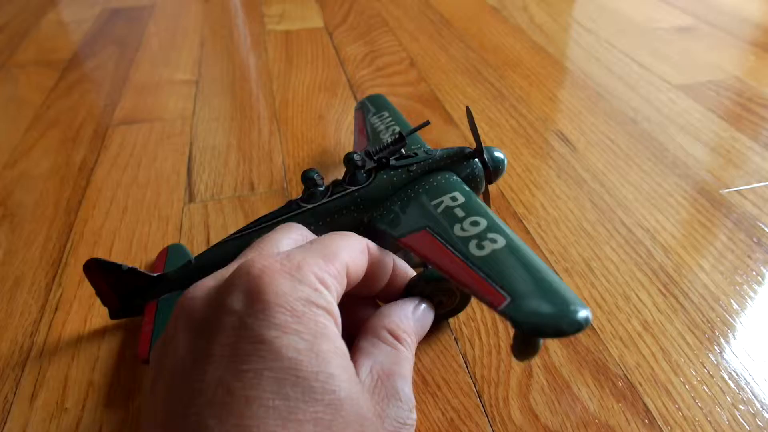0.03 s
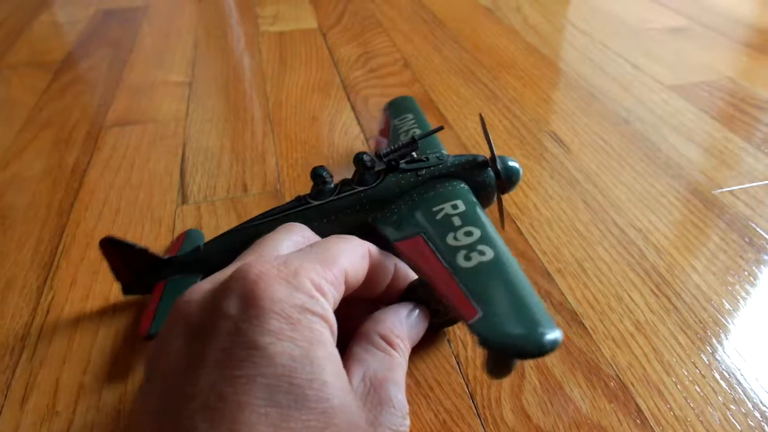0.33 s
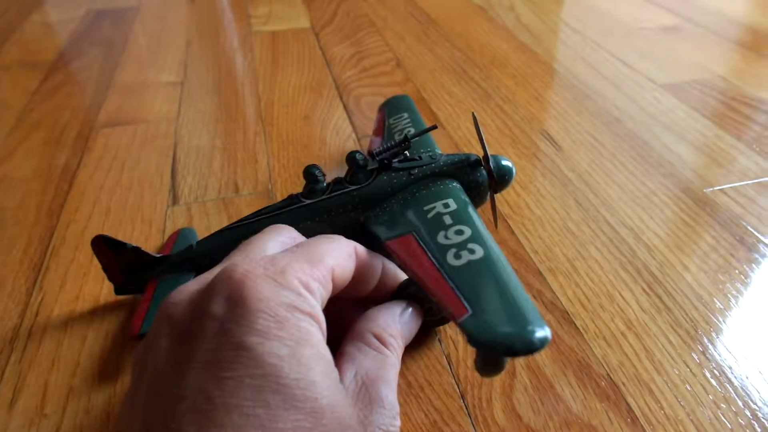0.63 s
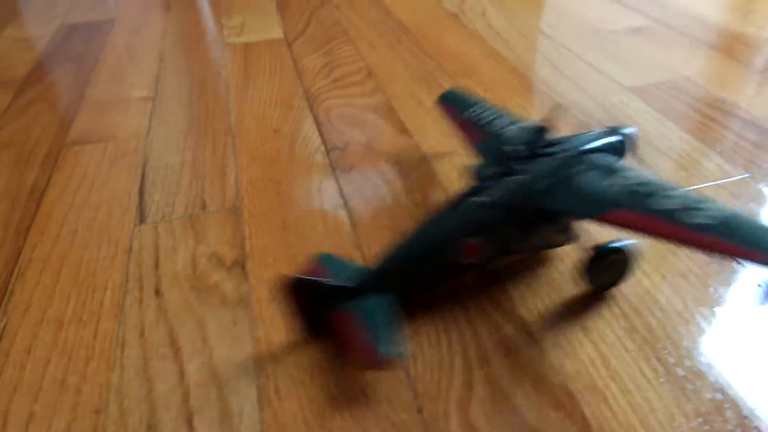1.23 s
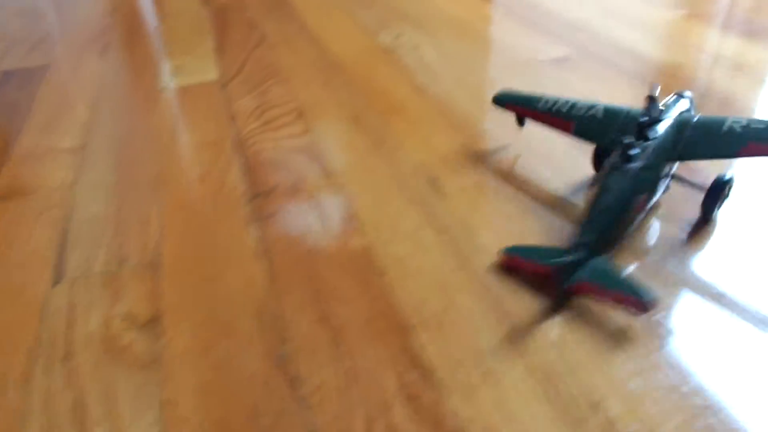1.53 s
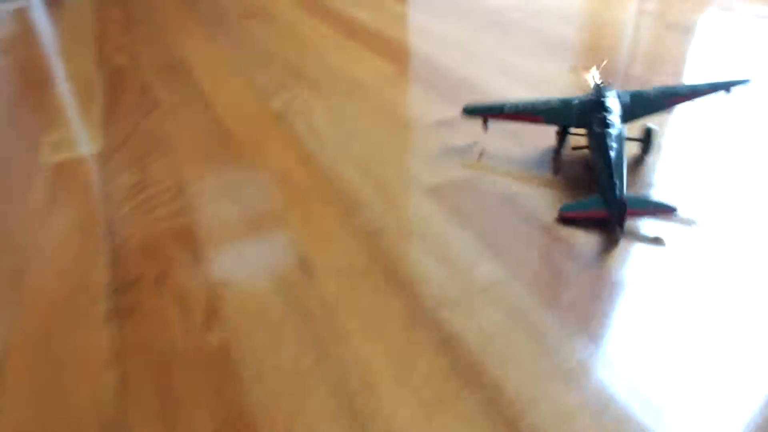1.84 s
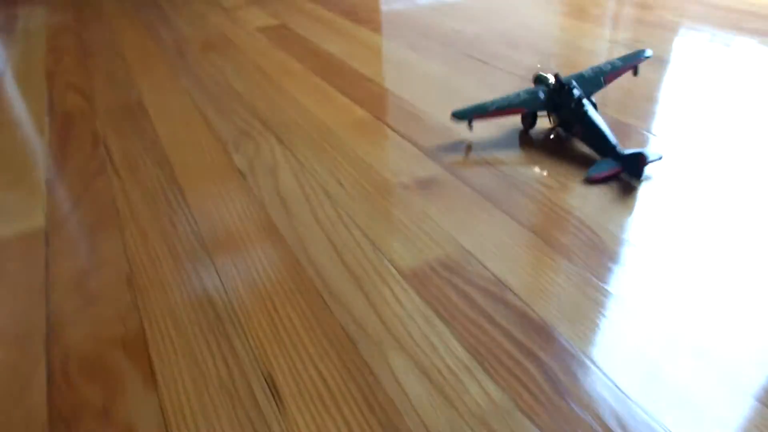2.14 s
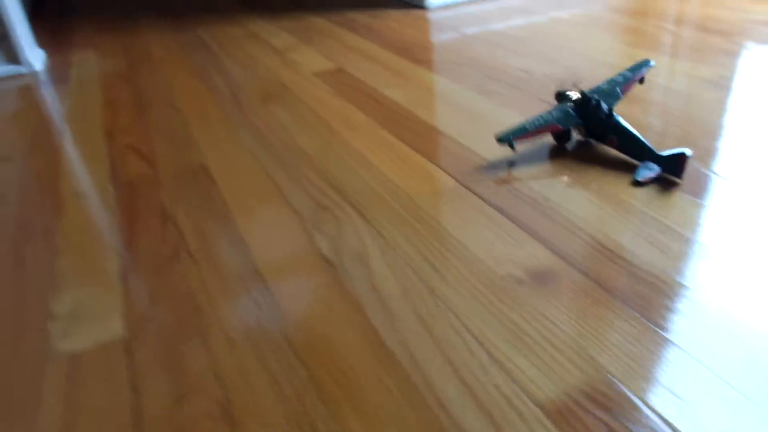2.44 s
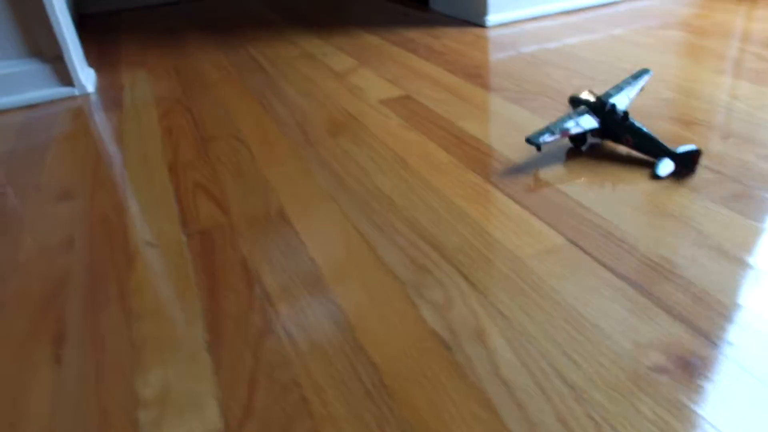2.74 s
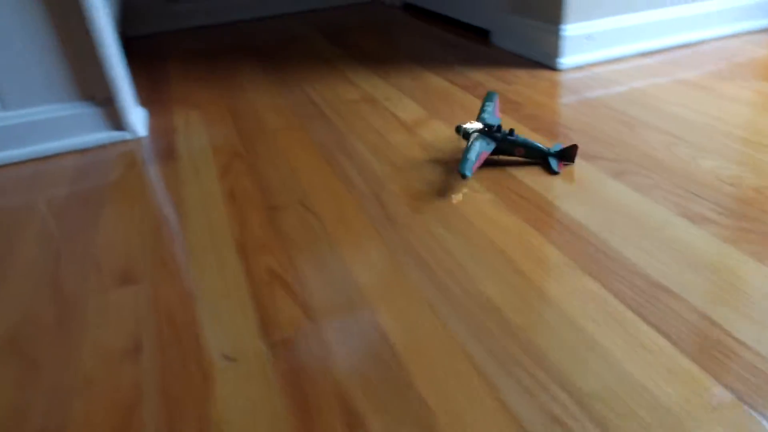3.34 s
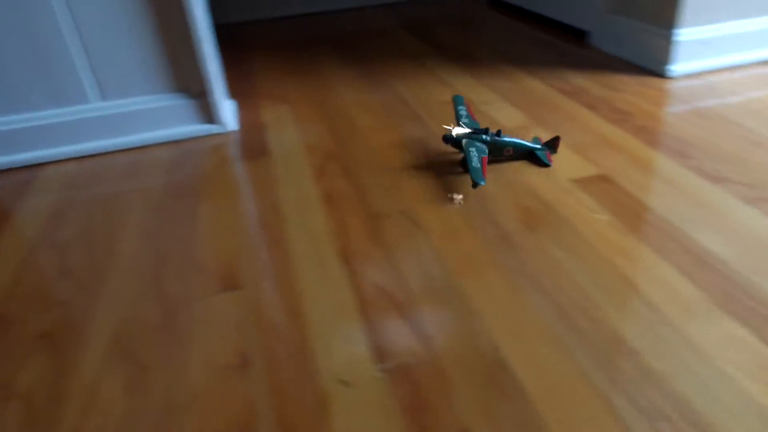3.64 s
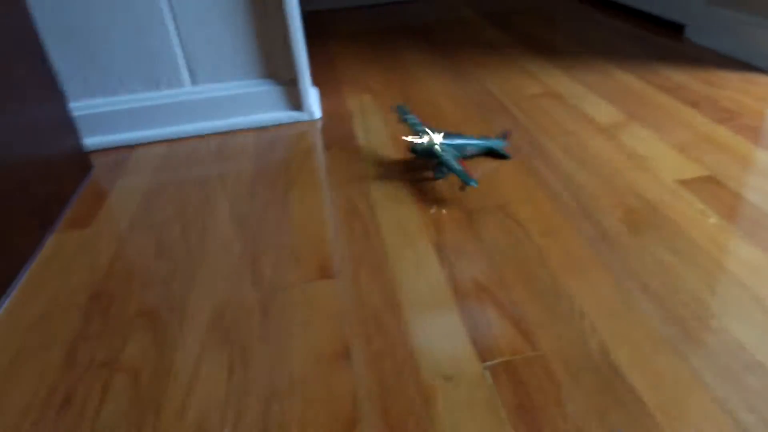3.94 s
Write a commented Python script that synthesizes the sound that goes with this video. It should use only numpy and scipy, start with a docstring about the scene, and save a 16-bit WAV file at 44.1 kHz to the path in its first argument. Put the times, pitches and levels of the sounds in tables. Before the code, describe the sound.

Clockwork whirring from a metal toy plane starts with a sharp snap after a few faint ticks. Its gears grind with a high, scratchy rasp while the wheels knock softly on floorboards, growing slightly more echoing indoors.

```python
"""Clockwork tin plane

A wound toy is held on a wooden floor, clicks a few times in the hand, then is let go and rolls away.
Gear teeth excite the modes of its tin shell, a flint rasps by friction on the spark wheel, and the
wheels rumble and knock softly on the boards. A small live room with a faint low hum surrounds it."""
import sys
import numpy as np
from scipy import signal
from scipy.fft import rfft, irfft, next_fast_len
from scipy.io import wavfile
from scipy.ndimage import map_coordinates

SR = 44100
rng = np.random.default_rng(int(sys.argv[2]) if len(sys.argv) > 2 else 0)


def master(y):
    """Save y as 16-bit WAV."""
    cut = np.clip(np.atleast_2d(y).T, -1, 1)
    pcm = np.round(cut * 32767)  # scale
    wavfile.write(sys.argv[1], SR, pcm.astype(np.int16))


N = 176400
T = np.arange(N) / SR

# modes of the tin shell: f/Hz, relative level/dB, t60/s
SHELL_MODES = [(957,-2,0.037),(1087,0.5,.03),(1256,0.5,0.013),(1495,-1.5,0.023),(1647,1,0.012),(1756,-3.5,0.018),(1880,0.5,0.022),(1975,0.5,0.019),(2204,-2.5,0.0087),(3450,-4.5,0.016),(4120,1.5,0.0083),(4600,-4,0.0084),(4850,2,0.0098),(5420,-3.5,0.0077)]


def from_db(db):
    """Amplitude ratio: a factor of ten for every 20 dB."""
    return 10 ** (np.asarray(db) / 20)


def unit_rms(x):
    """Normalisation to unit mean power."""
    return x / np.sqrt(np.mean(x ** 2) + 1e-20)


def in_time(curve):
    """Linear interpolation of (t/s, value) points at every sample."""
    return np.interp(T, *np.transpose(curve))


def colour(x, points, share=1):
    """Minimum-phase filter through (f/Hz, level/dB) points; folding the cepstrum makes it causal."""
    size = next_fast_len(N + SR // 2, True)
    hz, db = np.transpose(points)
    f = np.maximum(np.fft.rfftfreq(size, 1 / SR), 1)
    gain = from_db(share * np.interp(np.log(f), np.log(hz), db))
    cepstrum = irfft(np.log(gain), size)
    cepstrum[1:size // 2] *= 2
    cepstrum[size // 2 + 1:] = 0
    return irfft(rfft(x, size) * np.exp(rfft(cepstrum)), size)[..., :N]


def drift(corner_hz):
    """Slow random fluctuation: low-passed noise of unit rms."""
    hop, settle = 40, 2000
    r = np.exp(-2 * np.pi * corner_hz * hop / SR)
    noise = rng.standard_normal(N // hop + settle + 2)
    slow = signal.lfilter([1], [1, -2 * r, r * r], noise)[settle:]
    return np.interp(np.arange(N) / hop, np.arange(len(slow)), unit_rms(slow))


def ring(x, hz, t60):
    """Damped resonator, scaled to pass the same white-noise power whatever its decay."""
    r, w = from_db(-60 / (t60 * SR)), 2 * np.pi * hz / SR
    numerator = np.sqrt((1 - r * r) / 2) * np.array([1, 0, -1])
    return signal.lfilter(numerator, [1, -2 * r * np.cos(w), r * r], x + 1e-18)


def modes(x, table):
    """Modal superposition: a struck body responds as the sum of its resonances."""
    return sum(from_db(db) * ring(x, hz, t60) for hz, db, t60 in table)


def grains(per_s, spread_db):
    """Shot noise: independent tiny impacts, a few of them larger."""
    sizes = from_db(spread_db * np.minimum(rng.exponential(1, N), 4)) * rng.choice([-1, 1], N)
    return sizes * (rng.random(N) < per_s / SR)


def burst(onset_s, db, decay_s):
    """A brief rough contact: noise under an exponential decay."""
    envelope = (T >= onset_s) * np.exp(-np.minimum(abs(T - onset_s) / decay_s, 20))
    return from_db(db) * envelope * rng.standard_normal(N)


def room_tone():
    """Background noise: broadband air, with narrow noise bands heard as a low hum and a faint whine."""
    # spectrum of the air noise: f/Hz, relative density level/dB
    air_spectrum = [(15,-31),(25,-11),(53,-14),(80,-4.5),(180,-3),(570,-7.5),(800,-10),(1600,-12.5),(4000,-20),(8000,-29.5),(12500,-35),(15500,-42)]
    mid, side = rng.standard_normal((2, N))
    air = unit_rms(colour(mid + 0.62 * side * [[1], [-1]], air_spectrum))
    hum_hz = 82.9
    hum = unit_rms(ring(ring(rng.standard_normal(N), hum_hz, t60=.2), hum_hz, t60=.2))
    whine = unit_rms(ring(rng.standard_normal((2, N)), hz=11060, t60=0.016))
    return from_db(-55) * air + from_db(-68) * hum + from_db(-78.5) * whine


def reverberation(x, t60=0.47, step_s=.06):
    """Diffuse field: dense decaying reflections, different in each channel, renewed as the toy travels."""
    # colour of the reflections: f/Hz, gain/dB
    room_colour = [(100,-9),(700,-5),(1500,-1.5),(3500,0.5),(8000,1.5),(15000,4.5)]
    t, step = T[:SR // 2], int(step_s * SR)
    decay = from_db(-60 * t / t60) * (t > .001)
    decay /= np.sqrt(np.sum(decay ** 2))
    crossfade = np.sqrt(np.hanning(2 * step))
    out = np.zeros((2, N + SR))
    for start in range(0, N, step):
        piece = x[start:start + 2 * step]
        response = decay * rng.standard_normal((2, len(t)))
        echo = signal.fftconvolve([piece * crossfade[:len(piece)]], response, axes=1)
        out[:, start:start + echo.shape[1]] += echo
    return colour(out[:, :N], room_colour)


def wheels(start_s=1.12, rise_s=0.76):
    """Rolling noise: a rumble grows as the toy gathers speed, with dull impacts on the boards."""
    # spectrum of the rumble: f/Hz, relative density level/dB
    roll_spectrum = [(25,-12),(55,-5),(82,8),(120,-9),(190,-14.5),(270,6),(370,-8),(500,-7.5),(900,-14),(3000,-49)]
    # knocks on the boards: t/s, relative level/dB
    bumps = [(1.439,-39.5),(1.60,-44),(1.704,-41.5),(1.83,-48),(2.102,-48),(2.76,-49),(2.914,-47.5),(3.058,-43),(3.34,-50)]
    # colour of a knock: f/Hz, relative level/dB
    thud_colour = [(80,-33),(280,-7),(480,-3),(680,-5.5),(1200,-8),(4000,-40)]
    rise = np.clip((T - start_s) / rise_s, 0, 1)
    rumble = from_db(-61) * rise * unit_rms(colour(rng.standard_normal(N), roll_spectrum))
    knocks = sum(burst(s, db, decay_s=0.031) for s, db in bumps)
    return rumble + 10 * colour(knocks, thud_colour)


def catch_clicks():
    """Impact excitation: catch and gears slip and ring the shell; the wound spring pings as it settles."""
    # slips: t/s, relative level/dB, decay/s, low-pass f/Hz, shell drive/dB, catch drive/dB
    clicks = [(.208,-49,0.048,5000,-5,-10),(0.25,-41,.004,7000,-8,-2.5),(0.275,-34.5,0.0023,2500,-2,-18),(.282,-41,0.0034,4000,-6,-17),(0.299,-33.5,0.0058,6960,-2,-18),(0.326,-30.5,0.0063,2800,-5,-16),(.439,-38,0.0042,1900,-3,-21),(.857,-16,0.0022,9000,-9,-28),(.866,-26.5,0.0092,2500,0,-28),(.935,-25,0.0068,4000,-6,-20),(0.977,-31,0.0033,3000,-8,-24),(1.438,-23.5,0.0036,5000,-4,-24)]
    # colour of the contact noise: f/Hz, relative level/dB
    click_colour = [(60,-47),(250,-26),(600,-11.5),(800,-6.5),(1050,6),(1900,0.5),(2600,-2),(3350,0),(4300,-4.5),(5300,-1),(7000,-11),(15000,-6.5)]
    # modes of the catch: f/Hz, relative level/dB, t60/s
    catch_modes = [(3136,4,0.067),(3550,0,0.11),(5300,-11,0.08)]
    # modes of the coiled spring: f/Hz, relative level/dB, t60/s
    spring_modes = [(1946,3,0.062),(1987,5.5,0.13)]
    # pings of the spring: t/s, relative level/dB
    pings = [(0.441,-52),(0.49,-59),(.52,-65)]
    hits = np.array([signal.lfilter(*signal.butter(1, hz, fs=SR), burst(s, db, decay_s))
                     for s, db, decay_s, hz, *_ in clicks])
    *_, shell_db, catch_db = np.transpose(clicks)
    shell = modes(from_db(shell_db) @ hits, SHELL_MODES) / len(SHELL_MODES)
    catch = modes(from_db(catch_db) @ hits, catch_modes)
    spring = modes(sum(burst(s, db, decay_s=0.0051) for s, db in pings), spring_modes)
    return 2 * colour(hits.sum(0), click_colour) + shell + catch + 2 * spring


def flint_squeaks(per_s=22):
    """Stick-slip: the flint catches and rings briefly, each time at its own shrill pitch."""
    out = np.zeros(N + SR)
    for when, pitch, length in rng.random((int(per_s * N / SR), 3)):
        start = int(when * N)
        size = int(SR * 0.0072 * (.5 + 2 * length))
        slip = rng.standard_normal(size) * np.hanning(size)
        out[start:start + size] += ring(slip, hz=7000 + 8500 * pitch, t60=0.0046)
    return unit_rms(out[:N])


def gear_teeth(speed, teeth_per_s=135, jitter_periods=.12, spread_db=2.84):
    """Gear meshing: one impulse per tooth, uneven in time and strength."""
    position = np.cumsum(teeth_per_s * speed) / SR + jitter_periods * drift(60)
    count = np.floor(np.maximum.accumulate(position))
    return np.diff(count, prepend=count[0]) * from_db(spread_db * rng.standard_normal(N))


def grinding(teeth, pressure, spectrum, flicker_db):
    """Friction noise: grit and tooth ticks scale with pressure; bands flicker as the contact shifts."""
    grit = (grains(per_s=9000, spread_db=2) + from_db(9.5) * teeth) * pressure
    edges_hz = np.r_[90, np.linspace(800, 16500, 22)]
    out = 0
    for low, high in zip(edges_hz, edges_hz[1:]):
        band = signal.butter(2, [low, high], "band", fs=SR, output="sos")
        flicker = from_db(flicker_db * drift(14.7))
        out += flicker * signal.sosfilt(band, grit * rng.choice([-1, 1], N) + 1e-18)
    return unit_rms(colour(out, spectrum))


def shell_rattle(teeth, flicker_db=1.5, surge_db=0.94):
    """Forced vibration: teeth and loose parts strike the shell; groups of its modes swell separately."""
    # envelopes of four groups of modes, lowest first: t/s, relative level/dB
    belly_level = [(0.88, -37), (0.91, -48), (0.95, -36), (2.17, -41), (2.36, -34), (2.44, -49),
                   (2.61, -41), (2.7, -55), (2.75, -38.5), (3.24, -47), (3.37, -36), (3.5, -40.5),
                   (3.97, -38.5), (4.0, -31.5)]
    rattle_level = [(.88,-27.5),(.91,-49),(1.0,-36),(1.13,-34),(1.2,-31),(1.27,-28.5),(1.32,-32),(1.45,-30.5),(1.55,-33.5),(1.75,-28.5),(1.82,-34),(1.96,-28),(2.01,-34),(2.06,-30.5),(2.22,-33.5),(2.29,-29.5),(2.47,-38.5),(2.56,-30.5),(2.69,-44),(2.76,-32.5),(2.96,-36),(3.07,-32.5),(3.23,-36),(3.34,-29),(3.43,-35),(4,-32.5)]
    scrape_level = [(.88,-35),(1.3,-46),(1.9,-43.5),(2.6,-49),(3.28,-43),(3.33,-35),(3.8,-37),(4,-43)]
    tinny_level = [(.88,-31),(1.05,-37),(1.2,-32.5),(1.42,-39.5),(2.36,-44),(2.47,-36),(2.62,-45),(2.74,-52),(2.83,-35),(2.95,-48),(3.28,-42),(3.4,-37.5),(3.8,-36.5),(4,-43.5)]
    # lower f/Hz, upper f/Hz, envelope, gain/dB
    groups = [(800, 1400, belly_level, -1), (1400, 2900, rattle_level, -1.63),
              (2900, 4350, scrape_level, 0), (4350, 7000, tinny_level, 0)]
    loose_parts = from_db(-8.5) * grains(per_s=1500, spread_db=1.14)
    knocks = (teeth + loose_parts) * from_db(surge_db * drift(9.6))
    out = 0
    for low, high, level, gain_db in groups:
        rings = sum(from_db(db + flicker_db * drift(4.6)) * ring(knocks * rng.standard_normal(N), hz, t60)
                    for hz, db, t60 in SHELL_MODES if low <= hz < high)
        rings = signal.sosfilt(signal.butter(4, low, "high", fs=SR, output="sos"), rings)
        out += from_db(in_time(level) + gain_db) * unit_rms(rings)
    return out


def clockwork(release_s=.857, run_up_s=0.0026, spark_wheel_hz=36.6):
    """Impact and friction: the released spring drives the gears and the spark wheel at a wandering speed."""
    # spectra of the gear whirr and the flint rasp: f/Hz, relative density level/dB
    whirr_spectrum = [(100,-33),(300,-19),(650,-10.5),(950,-3.5),(1900,3),(2750,-1),(3600,0.5),(5200,-1),(6400,-1),(8000,-21),(15000,-26)]
    rasp_spectrum = [(2500,-22),(5500,-10),(7300,1.5),(8500,-0.5),(9600,0.5),(11200,0),(12700,-2),(14200,-1.5),(15500,0)]
    # their envelopes: t/s, relative level/dB
    whirr_level = [(0.88, -32), (1.07, -33), (1.19, -31.5), (1.51, -32), (1.87, -29.5), (2.43, -32.5),
                   (2.48, -31), (2.69, -32.5), (3.08, -32), (3.3, -32.5), (3.31, -31), (3.74, -32.5),
                   (3.77, -31.5), (4.0, -31.5)]
    rasp_level = [(.88,-30),(.97,-33),(1.04,-30),(1.25,-33),(1.44,-32.5),(1.75,-32.5),(2.2,-34),(2.6,-35),(2.96,-35),(3.25,-33.5),(3.6,-35),(4,-33.5)]
    whirr_db, rasp_db = in_time(whirr_level), in_time(rasp_level)
    speed = 1 + .06 * drift(1.2)
    teeth = gear_teeth(speed)
    wheel_angle = 2 * np.pi * np.cumsum(spark_wheel_hz * speed) / SR
    # the spark wheel runs out of true, and the flint's grip varies
    pressure = from_db(1.1 * np.sin(wheel_angle) + 0.9 * drift(46))
    rattle = shell_rattle(teeth)
    whirr = from_db(whirr_db + 0.3) * grinding(teeth, pressure, whirr_spectrum, flicker_db=1.1)
    rasp = from_db(rasp_db + 0.6) * grinding(teeth, pressure, rasp_spectrum, flicker_db=1.36)
    squeaks = from_db(rasp_db - np.median(rasp_db) - 42.5) * flint_squeaks()
    running = np.clip((T - release_s) / run_up_s, 0, 1)
    return (rattle + whirr + rasp + squeaks) * running


def scene():
    """Direct and reverberant sound: the room's share grows as the toy rolls away."""
    # bearing of the toy: t/s, delay of the left channel/s
    left_lag = [(.9,0.000024),(1.6,0.000053),(2.6,0.000045),(3.1,0.000034),(3.6,0.00003)]
    toy = clockwork() + catch_clicks() + wheels()
    left = map_coordinates(toy, [(T - in_time(left_lag)) * SR], order=5)
    direct = np.array([left, toy])
    wet = from_db(-4.5 + 0.62 * T)
    return (direct + wet * reverberation(toy)) / np.sqrt(1 + wet ** 2 / 2) + room_tone()


def record(dry, cutoff_hz=15800):
    """Channel imbalance and band limiting: the right side is louder, and the top is cut steeply."""
    # left against right: f/Hz, level/dB before each channel takes its share
    balance = [(100,-2),(400,-3),(1200,-5),(2300,-8),(4400,-4),(8000,-4.5),(15000,-2.5)]
    channels = np.array([colour(dry[0], balance, share=0.56), colour(dry[1], balance, share=-.5)])
    return signal.sosfilt(signal.ellip(12, .1, 80, cutoff_hz, fs=SR, output="sos"), channels)


dry = scene()
out = record(dry)
master(out)
```